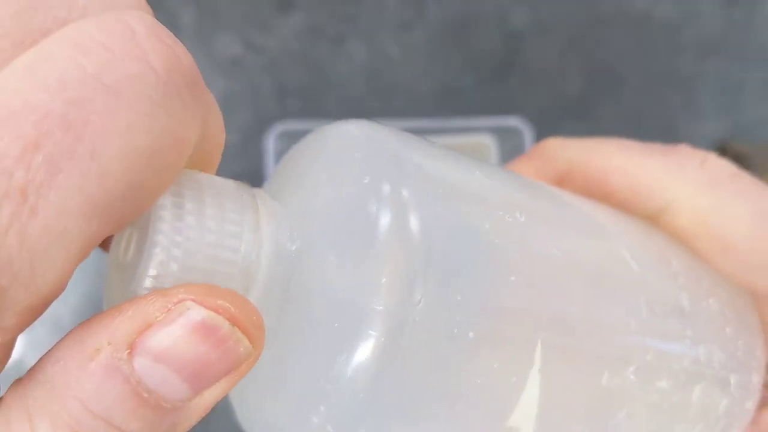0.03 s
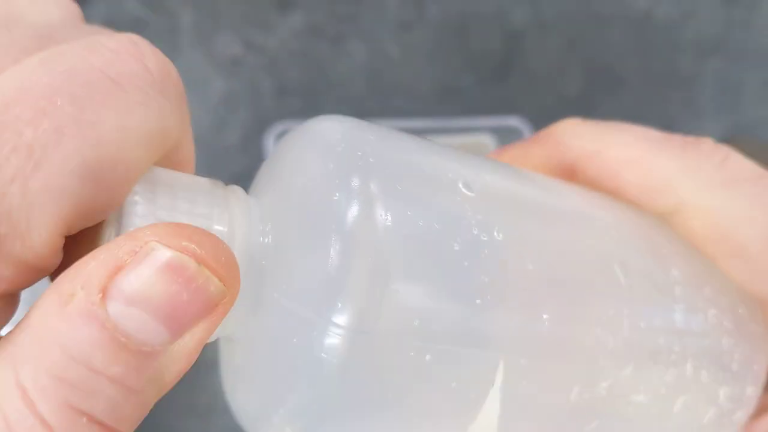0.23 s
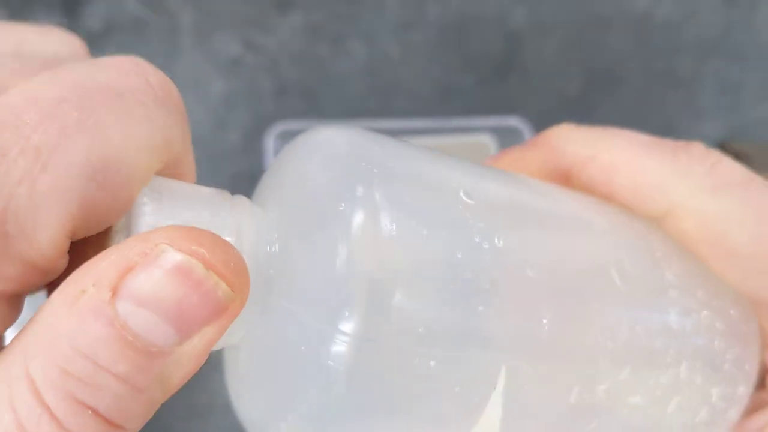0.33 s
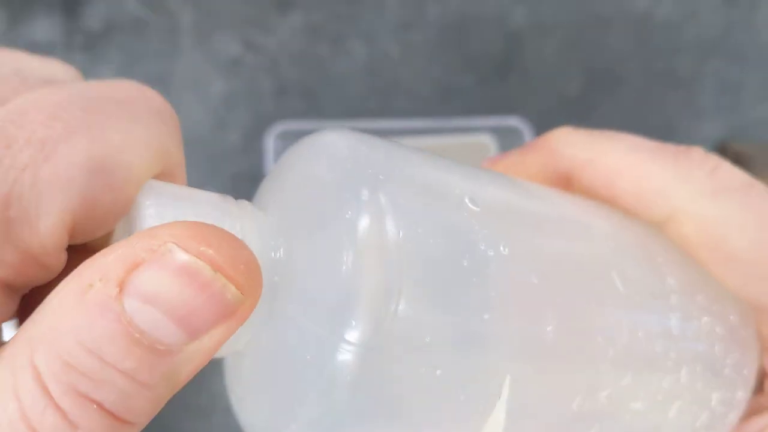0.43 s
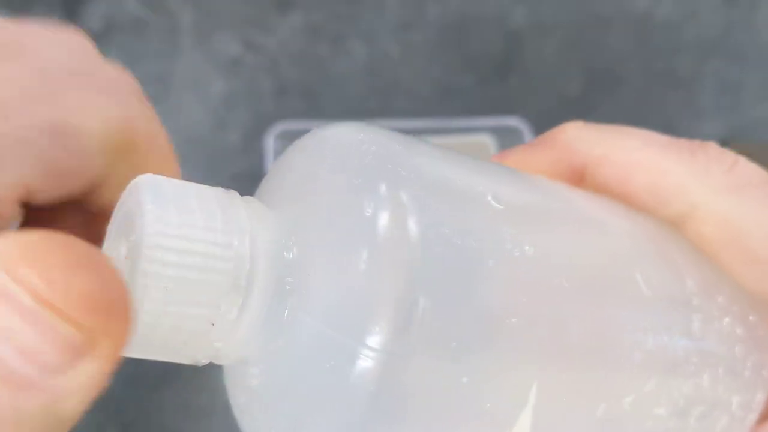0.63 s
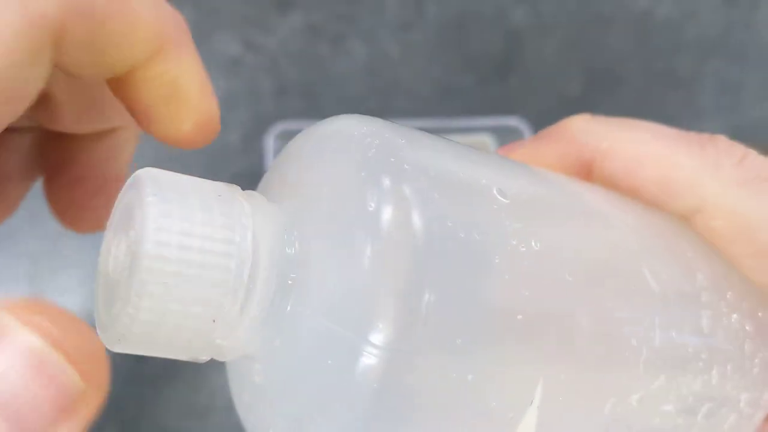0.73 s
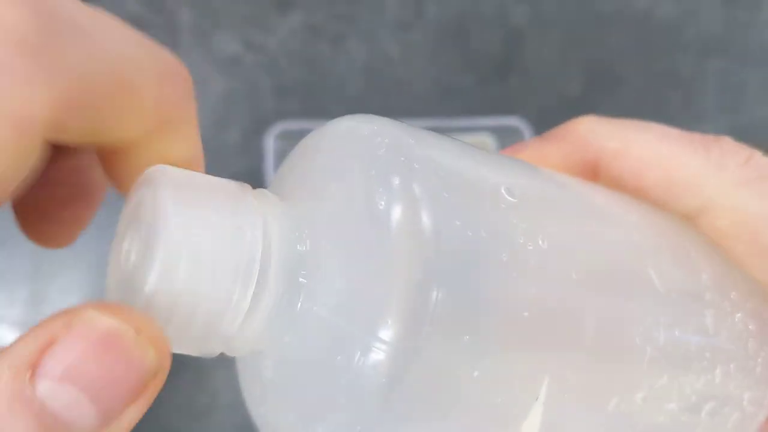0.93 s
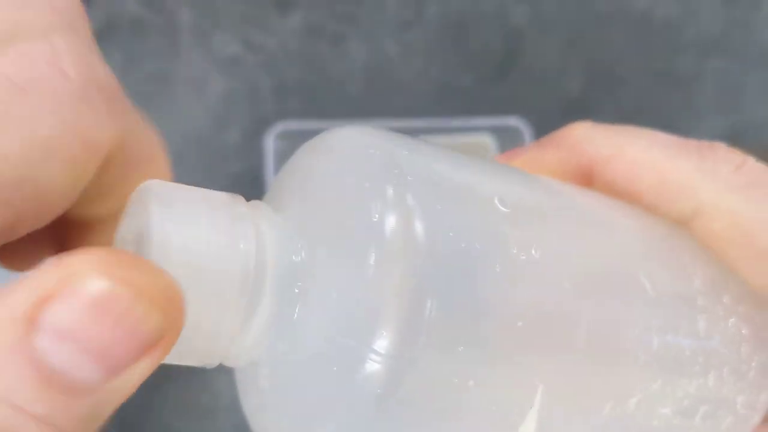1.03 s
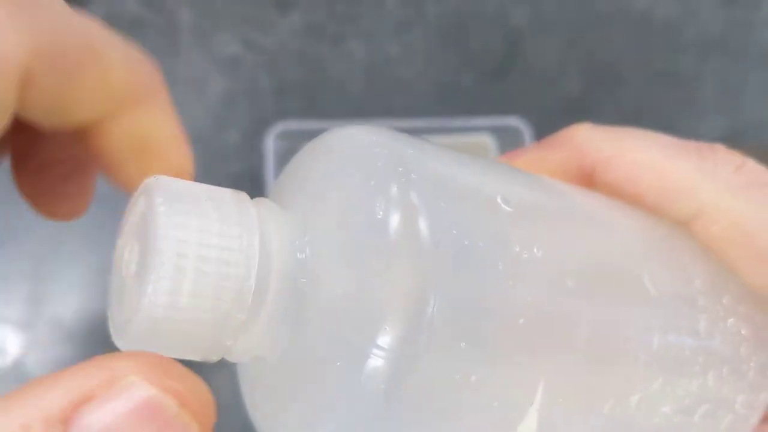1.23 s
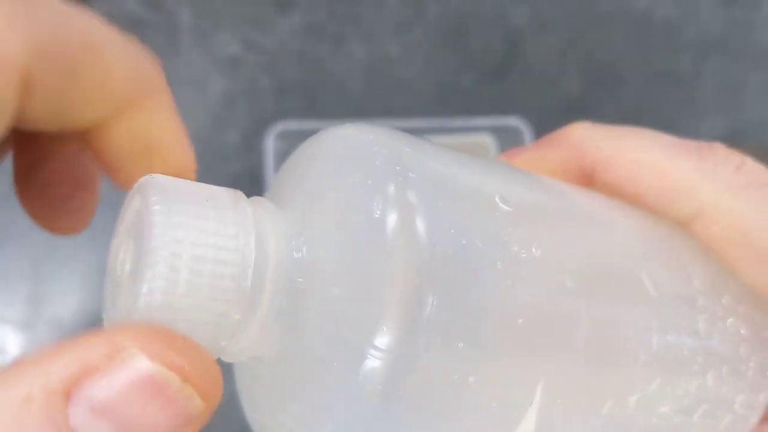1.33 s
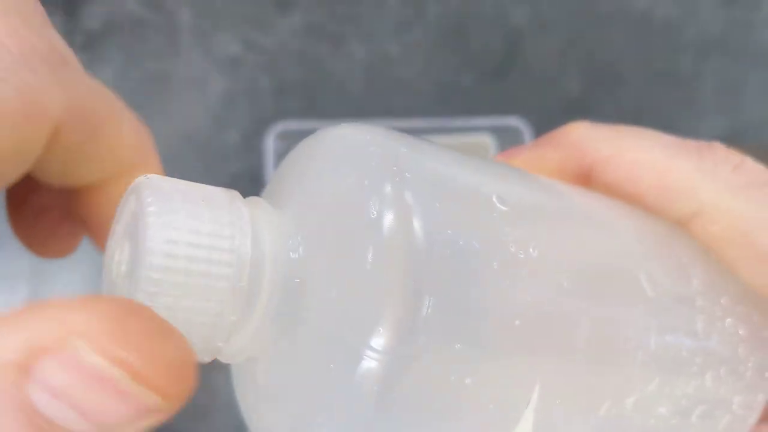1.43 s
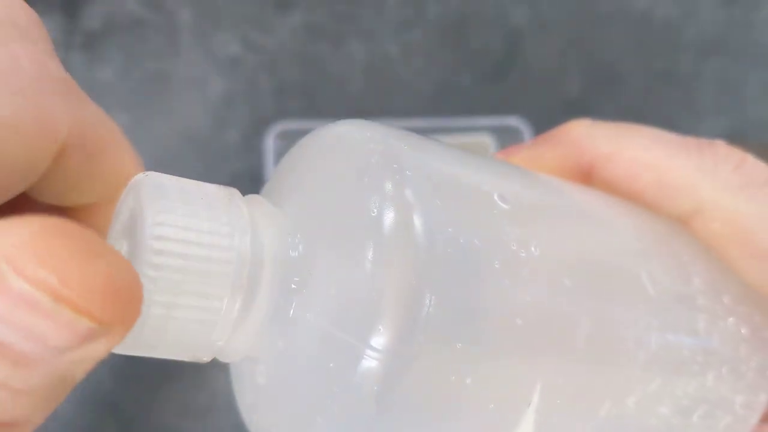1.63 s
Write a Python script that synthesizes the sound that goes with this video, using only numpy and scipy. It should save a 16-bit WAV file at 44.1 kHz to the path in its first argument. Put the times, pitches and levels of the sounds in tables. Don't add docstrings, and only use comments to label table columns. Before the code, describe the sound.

Close stereo pickup of a bottle cap being loosened: a sudden sharp hiss fades quickly, a faint tick follows, then snappy plastic clicks, skin scuffs and tiny squeaks, with low room rumble beneath.

```python
import sys
import numpy as np
from scipy import signal
from scipy.fft import rfft, irfft
from scipy.io import wavfile

SR = 44100
rng = np.random.default_rng(int(sys.argv[2]) if len(sys.argv) > 2 else 0)


def volts(x):
    e = np.asarray(x, float) / 20
    return 10 ** e


def wav_record(signal):
    frames = np.transpose(np.atleast_2d(signal))
    bounded = np.clip(frames, -1, 1)
    quanta = np.round(bounded * 32767).astype(np.int16)
    wavfile.write(sys.argv[1], SR, quanta)


N = 74970
LAG_S = .000275
LAG = round(LAG_S * SR)
T = np.arange(N) / SR
HZ = np.arange(N // 2 + 1) * SR / N


def at_hz(points, hz):
    p = np.array(points)
    return np.interp(np.log(hz + 1), np.log(p[:, 0]), p[:, 1])


def colour(x, points, lag_s=0.):
    delay = np.exp(-2j * np.pi * HZ * lag_s)
    return irfft(rfft(x) * volts(at_hz(points, HZ)) * delay, N)


def rms_one(x):
    return x / np.sqrt(np.mean(x ** 2))


def drift(rate_hz):
    r = np.exp(-2 * np.pi * rate_hz / SR)
    noise = rng.standard_normal(N + SR)
    return rms_one(signal.lfilter([1], [1, -2 * r, r * r], noise)[SR:])


def ring(x, hz, t60_s):
    r, w = volts(-60 / (t60_s * SR)), 2 * np.pi * hz / SR
    return signal.lfilter([0, np.sin(w)], [1, -2 * r * np.cos(w), r * r], x + 1e-18)


def near_port_cavity(x):
    cavity_hz, width_hz, lift_db = 11700, 900, 13.5
    r = np.exp(-np.pi * width_hz / SR)
    poles = [1, -2 * r * np.cos(2 * np.pi * cavity_hz / SR), r * r]
    peak = signal.lfilter([(1 - r * r) / 2, 0, (r * r - 1) / 2], poles, x)
    return x + (volts(lift_db) - 1) * peak


def both_ports(x, scattered, share, near, far):
    share = np.clip(share, 0, 1)
    at_far = np.sqrt(1 - share) * x + np.sqrt(share) * scattered
    return rms_one(np.array([colour(at_far, far, LAG_S), near_port_cavity(colour(x, near))]))


def jet():
    # t/s, level/dB, extra roar of the widening gap/dB
    flow = [
        (0.2301, -60, -0.5),
        (0.2336, -30.5, 8),
        (.25, -19, 2),
        (0.271, -14, -1.5),
        (.34, -14, -0.5),
        (0.373, -16, 1),
        (0.416, -31, 9),
        (.454, -54.5, 16),
        (0.509, -59.5, 8),
        (.78, -75, -6),
    ]
    # f/Hz, level/dB
    jet_near = [(1000, -47), (4200, -30), (7000, -22), (10000, -15.5), (12900, -18), (14000, -26),
                (15100, -19), (15600, -25.5)]
    # f/Hz, level/dB
    jet_far = [(2500, -40.5), (5200, -43.5), (6400, -24.5), (8300, -34.5), (9400, -16), (10700, -19),
               (13000, -19.5), (14500, -27.5)]
    flicker_db, flicker_hz, roar_below_hz = -0.5, 150, 7500

    s, db, roar_db = np.transpose(flow)
    noise = rng.standard_normal((2, N)) * volts(flicker_db * drift(flicker_hz))
    gas = both_ports(*noise, share=.24, near=jet_near, far=jet_far)
    low = irfft(rfft(gas) / (1 + (HZ / roar_below_hz) ** 6), N)
    roaring = gas - low + volts(np.interp(T, s, roar_db)) * low
    return volts(np.interp(T, s, db, left=-200, right=-200)) * roaring


def pop():
    start_s, level_db, t60_s, low_hz, high_hz = .2325, -42.5, 0.059, 250, 2780
    t = T - start_s
    noise = rng.standard_normal((3, N))
    shared_and_own = noise[0] + 1.5 * noise[1:]
    puff = shared_and_own * (t > 0) * volts(level_db - 60 * np.clip(t, 0, 1) / t60_s)
    band = signal.butter(2, [low_hz, high_hz], "band", fs=SR, output="sos")
    return 3 * signal.sosfilt(band, puff)


def deep_rush():
    widest_s, wide_for_s, level_db, far_db = 0.33, 0.04, -46.5, -9.5
    swell = np.exp(-((T - widest_s) / wide_for_s) ** 2)
    turbulence = rms_one(ring(rng.standard_normal(N), hz=2270, t60_s=0.0033))
    rush = volts(level_db) * swell * turbulence
    return np.array([volts(far_db) * np.roll(rush, LAG), rush])


def clicks():
    slip_s = [
        .627,
        .9668,
        .9873,
        .9941,
        .9955,
        1.0488,
        1.1368,
        1.615,
    ]
    # snap level/dB, brightest f/Hz, wall ring f/Hz, wall ring level/dB
    slips = [
        (-58, 3200, 1070, -48),
        (-25, 4900, 1045, -30),
        (-16, 6400, 3700, -38.5),
        (-40, 9200, 1300, -32.5),
        (-21, 4100, 1900, -32.5),
        (-22, 16000, 1505, -35),
        (-27, 2070, 1530, -35),
        (-59, 1260, 550, -50.5),
    ]
    # f/Hz, level at the near port/dB, level at the far port/dB
    cap_modes = [(1764, -9, 4), (2220, 3, -4), (2700, -5, 6), (3500, 1.5, -1.5), (4505, 0, -2),
                 (6000, 3, -17), (6800, 4, -6), (8220, 6.5, -30), (9420, -0.5, -12.5), (12400, -7, -14),
                 (15300, -6, -8)]
    below_db_per_oct, above_db_per_oct = 6.5, 4.5
    rebound_s, rebound_db = .0011, -11
    rustle_db, rustle_t60_s = -31, .03
    ring_cycles, detune = 26, .05
    wall_t60_s, wall_attack_s = .028, 0.00072
    body_hz, body_db, body_t60_s = 533, -4.5, 0.027

    out, size = np.zeros((2, N + SR)), 2200
    t = np.arange(size) / SR
    thin = signal.butter(2, 300, "high", fs=SR, output="sos")
    for s, (snap_db, bright_hz, wall_hz, wall_db) in zip(slip_s, slips):
        hit = np.zeros((2, size))
        for k, (hz, near_db, far_db) in enumerate(cap_modes):
            luck = rng.standard_normal(3)
            octaves = np.log2(hz / bright_hz)
            level = snap_db - max(above_db_per_oct * octaves, -below_db_per_oct * octaves)
            push = rng.standard_normal((2, size)) * volts(rustle_db - 60 * t / rustle_t60_s)
            push[:, 0] += (-1) ** k
            push[:, int(rng.uniform(.6, 1.6) * rebound_s * SR)] += volts(rebound_db)
            mode_hz = hz * (1 + detune * luck[2])
            mode = ring(push, mode_hz, min(ring_cycles / hz, wall_t60_s / 2))
            hit += volts(level + luck[:2] + [far_db, near_db])[:, None] * mode
        hit = signal.sosfilt(thin, hit)

        wall = volts(wall_db - 60 * t / wall_t60_s) * np.sin(2 * np.pi * wall_hz * t)
        wall *= 1 - np.exp(-t / wall_attack_s)
        body = volts(wall_db + body_db - 60 * t / body_t60_s) * np.sin(2 * np.pi * body_hz * t)

        i = int(s * SR)
        out[0, i + LAG:i + LAG + size] += hit[0]
        out[1, i:i + size] += hit[1]
        out[:, i + LAG // 2:i + LAG // 2 + size] += wall + body
    return out[:, :N]


def rub():
    # start t/s, end t/s, level/dB, fade/s
    strokes = [
        (0.426, 0.473, -57.5, 0.06),
        (0.553, 0.628, -58, 0.0096),
        (0.972, 0.977, -49, 0.0034),
        (0.986, 0.986, -73, .004),
        (0.986, 1.17, -46.5, 0.0089),
    ]
    # f/Hz, level/dB
    rub_near = [(600, -4), (1500, 0), (3000, 3), (4500, 2), (7000, 2), (9500, -3), (13300, -6), (15700, -5)]
    # f/Hz, level/dB
    rub_far = [(600, 3), (1500, 10.5), (3000, 9), (5000, 8.5), (6800, 4), (9000, 1), (12000, -9),
               (15800, -12)]
    slips_per_s, spread_db, swell_db, attack_s = 5200, 0, 0.5, 0.0011

    size = volts(spread_db * np.minimum(rng.exponential(1, (2, N)), 5))
    size = size * rng.choice([-1, 1], (2, N))
    grains = size * (rng.random((2, N)) < slips_per_s / SR)
    pressure = np.zeros(N)
    for start, end, db, fade in strokes:
        attack = np.clip((T - start) / attack_s, 0, 1)
        pressure += volts(db) * attack * np.exp(-np.clip(T - end, 0, 1) / fade)
    skin = both_ports(*grains, share=.45, near=rub_near, far=rub_far)
    return pressure * volts(swell_db * drift(25.)) * skin


def squeaks():
    # start t/s, length/s, f/Hz, level/dB
    catches = [
        (1.060, 0.022, 6800, -47),
        (1.108, 0.03, 4400, -52),
        (1.14, .014, 8630, -43),
        (1.133, 0.025, 2700, -43.5),
        (1.152, 0.015, 1780, -34),
        (1.176, 0.034, 1073, -53),
    ]
    out = np.zeros(N)
    for s, length, hz, db in catches:
        swell = np.sin(np.pi * np.clip((T - s) / length, 0, 1))
        out += volts(db) * swell * rms_one(ring(rng.standard_normal(N), hz, t60_s=.007))
    return np.array([volts(-6) * np.roll(out, LAG), out])


def room():
    # f/Hz, level/dB
    vent = [(20, -31.5), (35, -36), (55, -9.5), (85, -14.5), (125, 1), (190, -2.5), (330, -13.5),
            (750, -23), (900, -40), (1200, -60)]
    # f/Hz, likeness [0..1]
    vent_alike = [(40, .95), (150, .9), (300, .72), (650, .65), (1000, .5)]
    # f/Hz, left minus right/dB
    vent_lean = [(60, 1), (200, 0.5), (600, -1)]
    # f/Hz, level/dB
    hiss_colour = [(600, -37.5), (900, -7.5), (1710, -6), (2190, -12.5), (2570, -7), (2850, -18.5),
                   (5430, -24), (8000, -28.5), (11500, -24), (16000, -37)]
    vent_db, hiss_db = -44, -60

    mid, side, left, right = rfft(rng.standard_normal((4, N)))
    alike = np.clip(at_hz(vent_alike, HZ), 0, 1)
    sign = np.array([[1], [-1]])
    air = np.sqrt(1 + alike) * mid + sign * np.sqrt(1 - alike) * side
    air = air * volts(at_hz(vent, HZ) + sign * at_hz(vent_lean, HZ) / 2)
    hiss = volts(at_hz(hiss_colour, HZ)) * np.array([left, right])
    return volts(vent_db) * rms_one(irfft(air, N)) + volts(hiss_db) * rms_one(irfft(hiss, N))


def scene():
    gas = jet() + pop() + deep_rush()
    cap = clicks() + rub() + squeaks()
    return gas + cap + room()


def band_limit(x):
    return signal.sosfilt(signal.butter(12, 16890, fs=SR, output="sos"), x)


def record(dry):
    top_cut = signal.ellip(12, .5, 60, 15720, fs=SR, output="sos")
    return band_limit(signal.sosfilt(top_cut, dry))


dry = scene()
out = record(dry)
wav_record(out)
```